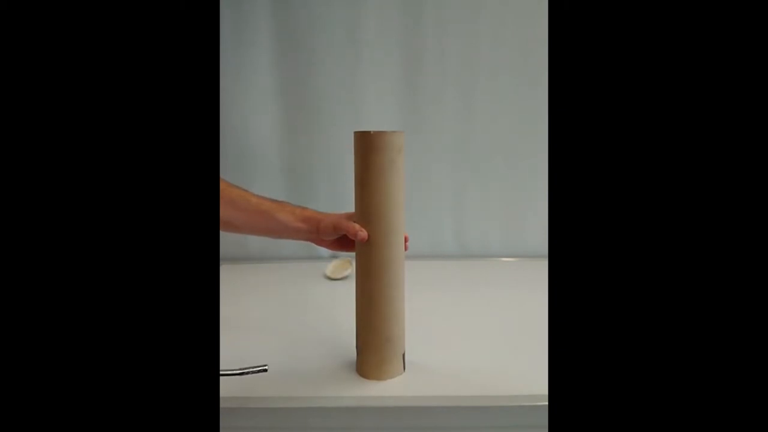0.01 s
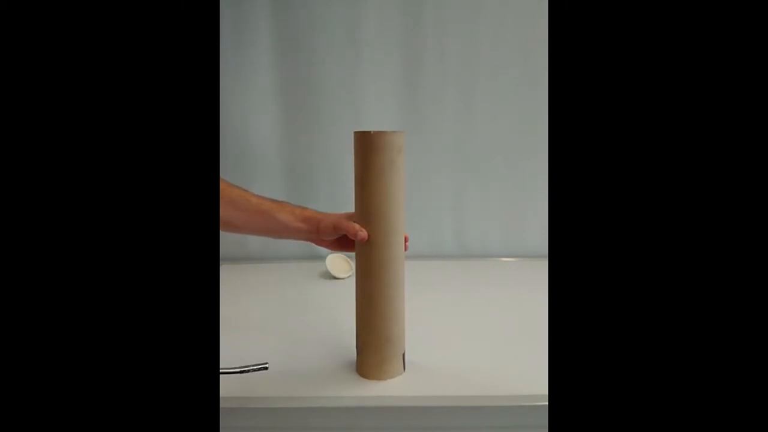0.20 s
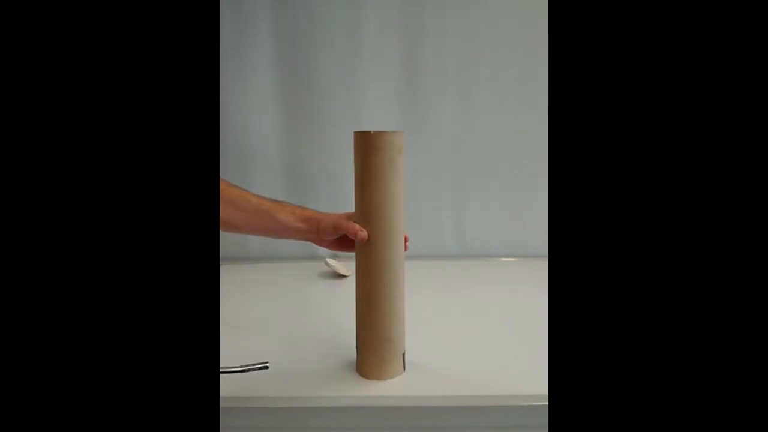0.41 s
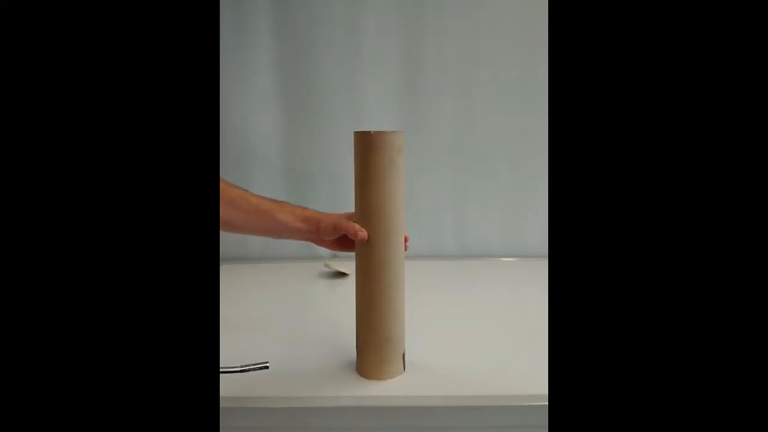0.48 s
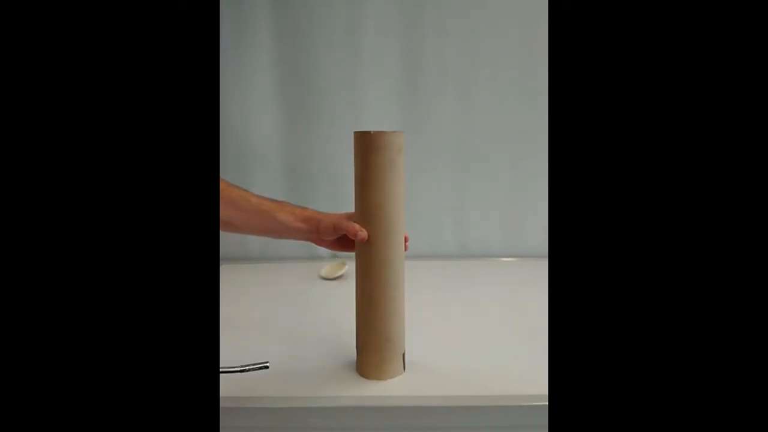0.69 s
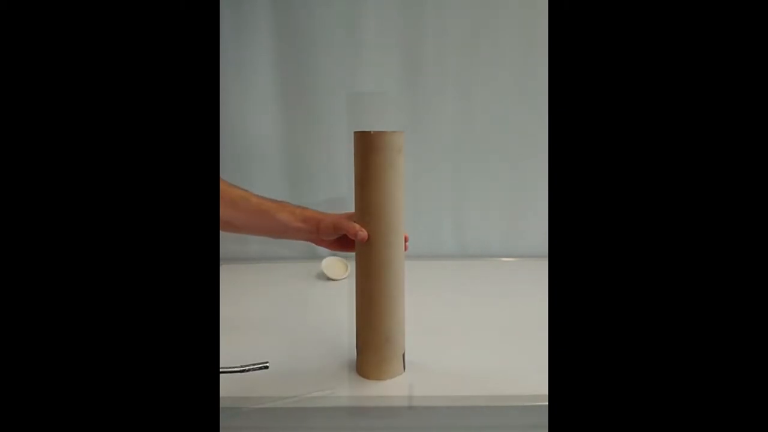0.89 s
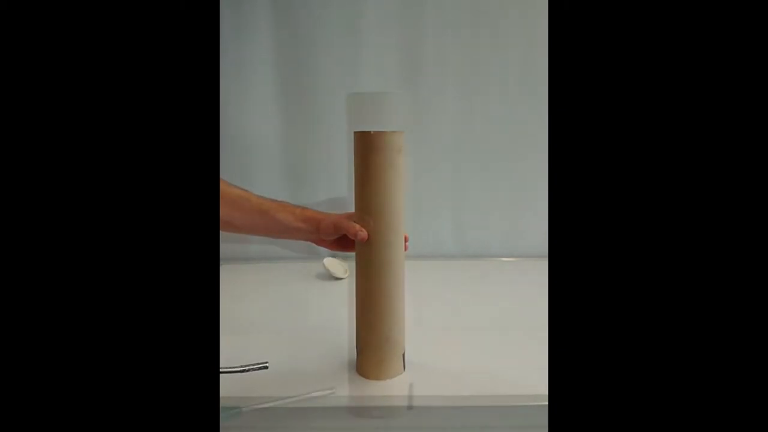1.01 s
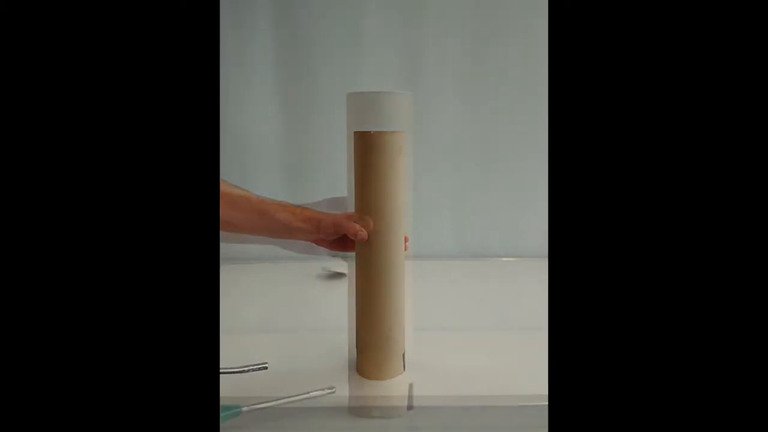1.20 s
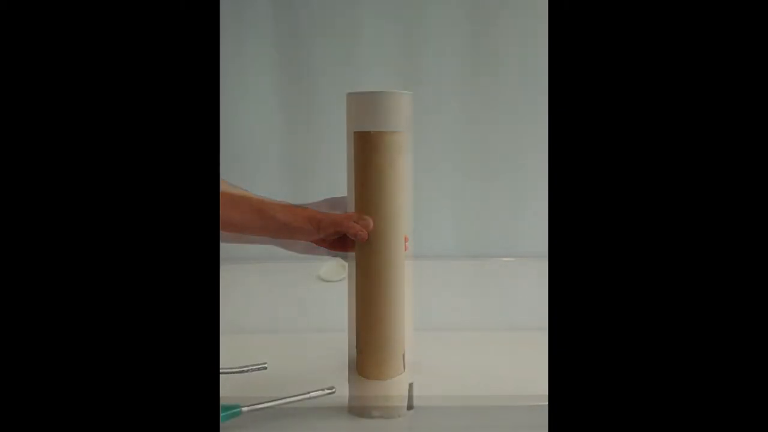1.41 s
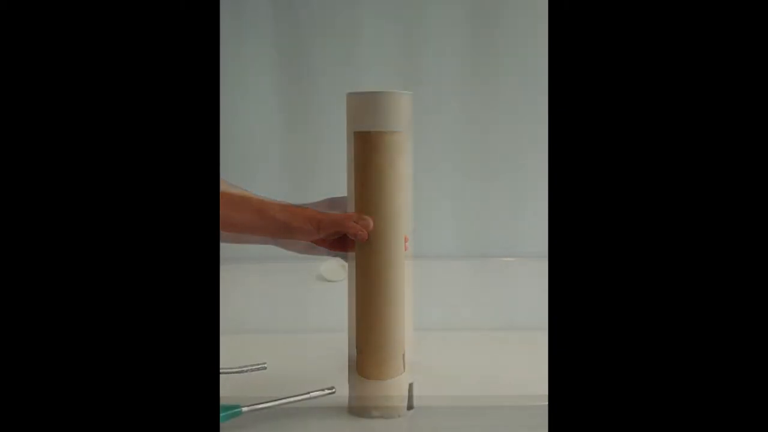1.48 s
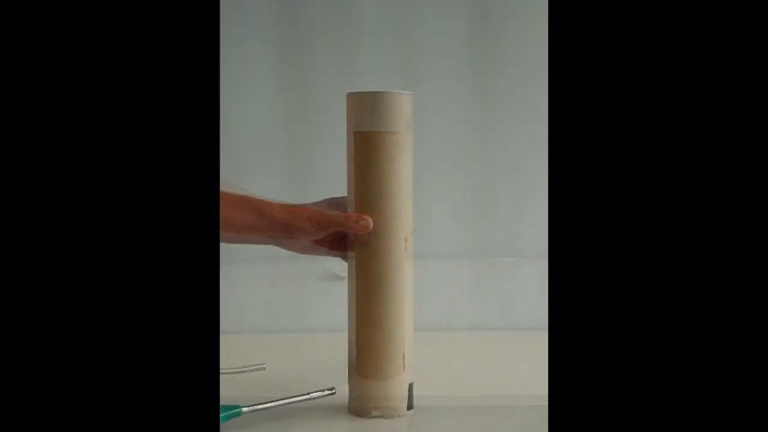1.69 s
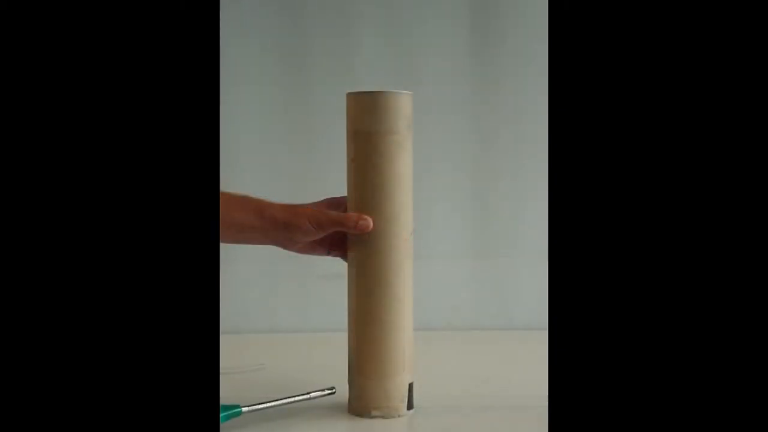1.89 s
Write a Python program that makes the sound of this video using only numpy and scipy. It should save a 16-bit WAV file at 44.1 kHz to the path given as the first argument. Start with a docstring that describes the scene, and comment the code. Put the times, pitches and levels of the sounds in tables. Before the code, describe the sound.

Sharp hollow pop of gas igniting in a cardboard tube, echoing away in a large hall

```python
"""Pop of a gas tube in a large hall

Gas vapour ignites in an upright cardboard tube: one sharp pop with a very brief soft puff of noise
around it, and a short hoot. The pop is a pulse that repeats as echoes off table and walls.
The hoot is a few fading sine tones. Shaped noise and low humming tones make the long reverberation.
Two faint knocks, each a short tone with a puff of noise, sound near the end over quiet room noise."""
import sys
import numpy as np
from scipy import signal
from scipy.io import wavfile

SR = 44100
rng = np.random.default_rng(int(sys.argv[2]) if len(sys.argv) > 2 else 0)


def waveform_to_disk(signal):
    """Save audio, clipped to [-1, 1], as 16-bit WAV at the path in sys.argv[1]."""
    frames = np.transpose(np.atleast_2d(signal))
    scaled = np.clip(frames, -1, 1) * 32767
    samples = np.round(scaled).astype(np.int16)
    wavfile.write(sys.argv[1], SR, samples)


N = 83790  # length in samples, 1.9 s

# Spectrum shape of the room noise. Each row: frequency in Hz, relative level in dB per Hz.
ROOM_SPECTRUM = [(25, -5.5), (45, -15.5), (95, -6.5), (150, -18.5), (300, -19), (600, -19.5), (1000, -20),
                 (1400, -32.5), (3000, -36.5), (3900, -43.5), (4300, -53.5), (15000, -57)]
# Faint steady tones in the room. Each row: frequency in Hz, level in dB.
ROOM_TONES = [(860, -84), (2660, -96)]
# Faint knocks. Each row: start in seconds, level in dB, pitch in Hz, decay time in seconds.
KNOCKS = [(1.574, -52.5, 240, 0.0076), (1.768, -50.5, 575, 0.0029)]
# How alike the two ears hear noise from all sides. Each row: frequency in Hz, left-right correlation.
EAR_LIKENESS = [(30, 1), (100, 0.55), (200, 0.52), (450, 0.017), (900, 0.023), (2000, -0.062), (4000, 0.13),
                (12000, -0.026)]
# Which side that noise leans to. Each row: frequency in Hz, left minus right in dB.
EAR_LEAN = [(60, -3), (250, -8), (600, -1), (2000, -2.5), (4000, 5), (12000, -2)]
# Reverberation of the hall, before the late fade.
# Each row: frequency in Hz, level in dB relative to the pop's spectrum, time to fall 60 dB in seconds.
HALL_BANDS = [(40.3, 4, 4.5), (73.5, -1, 2.8), (89.9, 8.5, 2.8), (135, 3.5, 2.2), (270, -2.5, 2.37),
              (352, -1.5, 2.67), (480, 1, 2.57), (746, -2, 3.07), (1170, 1, 3.03), (1440, 0.5, 3.39),
              (1750, 0.5, 3.56), (2750, 2, 3.03), (3704, 8.5, 2.15), (5900, -21, 1.4), (8400, 5, 2.9),
              (13200, 2.5, 2.6)]
# Extra fade of the late tail. Each row: frequency in Hz, fade in dB per second squared.
LATE_FADE = [(100, 16), (340, -2), (700, 18.5), (1700, 15.5), (3000, 25), (10000, 13.5)]
# Low humming tones of the hall, each fading at its own pace; the low pair beats.
# Each row: frequency in Hz, level in dB, time to fall 60 dB in seconds, left minus right in dB.
HALL_TONES = [(91.4, -47.5, 2.3, -3.5), (103.4, -52, 3.6, 0.5), (264, -44.5, 1.6, 2.5),
              (338.3, -55.5, 3.96, -1)]
# Air column of the tube. Each row: frequency in Hz, level in dB, time to fall 60 dB in seconds.
TUBE_MODES = [(96.4, -28.5, 0.2), (235.3, -22, 0.094), (434.5, -28.5, 0.22), (680, -21, 0.089),
              (747, -38.5, 0.06)]
# Spectrum shape of the pop: a bang under 4 kHz with a thin sizzle on top.
# Each row: frequency in Hz, relative level in dB per Hz.
POP_SPECTRUM = [(30, -22), (100, -20), (160, -12.5), (250, -2), (390, -8), (480, -3.5), (680, 0.5),
                (950, -4.5), (1160, -6.5), (1420, -16), (1650, -9.5), (1850, -12.5), (2400, -21),
                (3100, -26.5), (3650, -37), (4080, -35.5), (4250, -68), (7750, -66), (8000, -47),
                (11000, -43), (12000, -66.5), (13000, -46.5), (15000, -45), (16000, -59.5)]
# The pop arriving directly, then off table and walls. Each row: start in seconds, level in dB,
# left minus right in dB, left lag in ms, thin below this Hz, dull above this Hz,
# scatter level in dB relative to the pulse, scatter decay time in seconds.
ARRIVALS = [(0.2409, 5, -1, 0.25, 100, 14000, -6, 0.012), (0.2552, 5, 0, 0.2, 700, 14000, -8, 0.012),
            (0.2587, -6.5, 6.5, -0.44, 900, 9000, 7.5, 0.0068),
            (0.263, -9, -0.5, 0.021, 200, 1500, 0.5, 0.01), (0.2735, -2, 8, 0.47, 1600, 14000, -3.5, 0.009),
            (0.2757, -6.5, -2.5, 0.91, 500, 6000, -1.5, 0.002),
            (0.3017, -7.5, -8.5, -0.13, 1400, 14000, 1.5, 0.0016),
            (0.3328, -10.5, -12.5, 0.57, 2000, 10000, 5, 0.009),
            (0.3340, 2.5, -3.5, 0.72, 250, 1800, -10, 0.0031),
            (0.3372, -16, -10, 0.83, 198, 1500, -15, .005), (0.3680, 0, -2.5, -1.9, 350, 1200, -5, 0.0046),
            (0.3942, -3.5, -4, 1.3, 350, 1100, -0.5, .005), (0.4440, -19, -9, 0.55, 300, 1500, 5.5, 0.015),
            (0.4690, -6.5, -2, -0.87, 145, 900, 2, 0.0017),
            (0.6540, -26.5, -30, 0.66, 400, 3000, -0.5, 0.0083),
            (0.7270, -16, 8.5, -0.92, 200, 1600, 1, 0.004)]

POP_S = ARRIVALS[0][0]  # moment of the pop
ROOM_DB = -69
ROOM_TONE_WAVER_RAD, ROOM_TONE_WAVER_S = 1, 0.024  # size and pace of the tones' phase wander
KNOCK_RISE_S, KNOCK_NOISE, KNOCK_DULL_HZ = 0.00095, 0.38, 872
HALL_DB, HALL_RISE_S = -28, 0.055
HALL_RIPPLE_DB, HALL_RIPPLE_HZ = 2.5, 35.3  # some pitches ring more strongly than their neighbours
FADE_FROM_S = 0.96  # from here most of the tail sinks ever faster
END_S, END_DB_PER_S = 1.768, 154  # the last trace of the noise dies quickly
TUBE_RISE_S, TUBE_PAN_DB = 0.0045, -4.5
PUFF_DB, PUFF_S = -25, 0.0022  # soft noise around the bang
SCATTER_RISE_S = 0.00031  # scattered sound builds up behind each arrival
EDGE_HZ = 15900  # upper edge of the sound


def amp(db):
    """Turns decibels into gain."""
    return 10 ** (np.asarray(db) / 20)


def unit(x):
    """Scales a signal to rms 1."""
    return x / np.sqrt(np.mean(x ** 2) + 1e-20)


def read(table, hz, axis=1):
    """Reads one column of a table, in between its rows, on a log-frequency axis."""
    table = np.array(table, float)
    return np.interp(np.log(hz + 1), np.log(table[:, 0] + 1), table[:, axis])


def pan(db):
    """Gives left and right gains for a level difference."""
    return amp(np.array([db, -db]) / 2)


def add(mix, s, sound):
    """Mixes a sound in at time s in seconds."""
    part = mix[max(round(s * SR), 0):][:len(sound)]
    part += sound[:len(part)]


def wobble(count, width):
    """Makes smooth random values of rms 1 that stay alike over about width steps."""
    steps = np.arange(-count, count + 1)
    kernel = np.exp(-0.5 * (2 * steps / width) ** 2)
    return unit(signal.fftconvolve(rng.standard_normal(count), kernel, "same"))


def pulse(gain_at, size=4096):
    """Makes the sharpest pulse with a given spectrum that starts at once, of energy 1."""
    hz = abs(np.fft.fftfreq(size, 1 / SR))
    log_gain = np.log(np.maximum(gain_at(hz), 1e-6))
    spectrum = np.exp(np.conj(signal.hilbert(log_gain)))  # minimum phase: energy comes as early as it can
    shape = np.fft.ifft(spectrum).real
    return shape / np.linalg.norm(shape)


def diffuse(level_db, size=1024):
    """Makes stereo noise from all sides; level_db(t, hz) shapes it, rms about 1 where that is loudest."""
    hop = size // 4
    hz = np.fft.rfftfreq(size, 1 / SR)
    t = np.arange(N // hop + 6)[:, None] * hop / SR
    a, b, c, d = rng.standard_normal((4, len(t), len(hz)))
    left, other = a + 1j * b, c + 1j * d
    same = np.clip(read(EAR_LIKENESS, hz), -1, 1)
    right = same * left + np.sqrt(1 - same ** 2) * other
    gain = amp(level_db(t, hz) + 0 * t)  # 0 * t spreads a steady level over all times
    frames = np.array([left, right]) * gain * pan(read(EAR_LEAN, hz))[:, None]
    noise = signal.istft(frames.transpose(0, 2, 1), nperseg=size, noverlap=size - hop)[1][:, :N]
    return noise * np.sqrt(1.5 / (gain ** 2).sum(1).max())


def room_noise():
    """Steady quiet air of the hall: shaped noise with two faint tones whose phase wavers."""
    t = np.arange(N) / SR
    tones = np.zeros(N)
    for hz, db in ROOM_TONES:
        waver = ROOM_TONE_WAVER_RAD * wobble(N, ROOM_TONE_WAVER_S * SR)
        tones += amp(db) * np.sin(2 * np.pi * hz * t + waver)
    air = diffuse(lambda t, hz: read(ROOM_SPECTRUM, hz), size=2048)
    return amp(ROOM_DB) * air + tones


def knocks():
    """Soft dull knocks: a tone that dies within milliseconds and a puff of low noise."""
    out, t = np.zeros(N), np.arange(SR // 8) / SR
    low_pass = signal.butter(4, KNOCK_DULL_HZ, fs=SR)
    for s, db, hz, decay_s in KNOCKS:
        puff = unit(signal.lfilter(*low_pass, rng.standard_normal(len(t))))
        tone = np.sin(2 * np.pi * hz * t)
        shape = np.exp(-t / decay_s) * (1 - np.exp(-t / KNOCK_RISE_S))
        add(out, s, amp(db) * shape * (tone + KNOCK_NOISE * puff))
    return out


def hall(size=2048):
    """Dense reverberation swells behind the pop, and each pitch range dies away at its own pace."""
    def level_db(t, hz):
        decay = 60 * np.maximum(t - POP_S, 0) / read(HALL_BANDS, hz, axis=2)
        late_fade = read(LATE_FADE, hz) * np.maximum(t - FADE_FROM_S, 0) ** 2
        end_fade = END_DB_PER_S * np.maximum(t - END_S, 0)
        ripple = HALL_RIPPLE_DB * wobble(len(hz), HALL_RIPPLE_HZ / hz[1])
        ripple = ripple * np.minimum(hz / 1000, 1)  # weaker below 1 kHz
        return read(POP_SPECTRUM, hz) + read(HALL_BANDS, hz) + ripple - decay - late_fade - end_fade

    since_pop = np.maximum(np.arange(N) / SR - POP_S, 0)
    swell = 1 - np.exp(-since_pop / HALL_RISE_S)
    return amp(HALL_DB) * swell * diffuse(level_db, size=size)


def hall_hum():
    """Low humming tones of the hall build up after the pop, each fading at its own pace."""
    t = np.maximum(np.arange(N) / SR - POP_S, 0)
    late = np.maximum(np.arange(N) / SR - FADE_FROM_S, 0)
    hum = np.zeros((2, N))
    for hz, db, t60, pan_db in HALL_TONES:
        level_db = db - 60 * t / t60 - read(LATE_FADE, hz) * late ** 2
        hum += pan(pan_db)[:, None] * amp(level_db) * np.sin(2 * np.pi * hz * t)
    return hum * (1 - np.exp(-t / HALL_RISE_S))


def tube():
    """The blast sets the air column ringing at a few pitches, which soon fade: a short hoot."""
    out, t = np.zeros(N), np.arange(SR // 2) / SR
    ring = sum(amp(db - 60 * t / t60) * np.sin(2 * np.pi * hz * t) for hz, db, t60 in TUBE_MODES)
    add(out, POP_S, ring * (1 - np.exp(-t / TUBE_RISE_S)))
    return out * pan(TUBE_PAN_DB)[:, None]


def onset_puff():
    """A very brief soft puff of noise around the bang, swelling and sinking within milliseconds."""
    # distance in time from the bang, rounded off at the peak
    away = np.hypot(np.arange(N) / SR - POP_S, PUFF_S) - PUFF_S
    return amp(PUFF_DB) * np.exp(-away / PUFF_S) * diffuse(lambda t, hz: read(POP_SPECTRUM, hz))


def pop_and_echoes(size=4096):
    """The pressure pulse arrives along each path, coloured on the way and trailed by scattered sound."""
    out, t = np.zeros((2, N)), np.arange(size) / SR
    for s, db, pan_db, lag_ms, thin_hz, dull_hz, scatter_db, scatter_s in ARRIVALS:
        def path_gain(hz):
            dull = np.hypot(1, (hz / dull_hz) ** 2)
            thin = np.hypot(1, thin_hz / (hz + 20))
            return amp(read(POP_SPECTRUM, hz)) / dull / thin

        bang = -pulse(path_gain)
        trail = np.exp(-t / scatter_s) * (1 - np.exp(-t / SCATTER_RISE_S)) ** 2
        for ear, gain, lag_s in zip(out, pan(pan_db), (lag_ms / 1000, 0)):
            # each ear gets its own scatter
            scatter = signal.fftconvolve(bang, trail * rng.standard_normal(size))[:size]
            scatter = amp(scatter_db) * scatter / np.linalg.norm(scatter)
            add(ear, s + lag_s, amp(db) * gain * (bang + scatter))
    return out


def scene():
    """Adds the background, the hall, the tube, the soft puff and the pop together."""
    background = room_noise() + knocks()
    reverberation = hall() + hall_hum()
    return background + reverberation + tube() + onset_puff() + pop_and_echoes()


def record(dry):
    """Removes the highest treble with a steep low-pass filter that adds no delay."""
    low_pass = signal.firwin(511, EDGE_HZ, window=("kaiser", 9), fs=SR)
    return signal.oaconvolve(dry, low_pass[None], "same")


dry = scene()
out = record(dry)
waveform_to_disk(out)
```